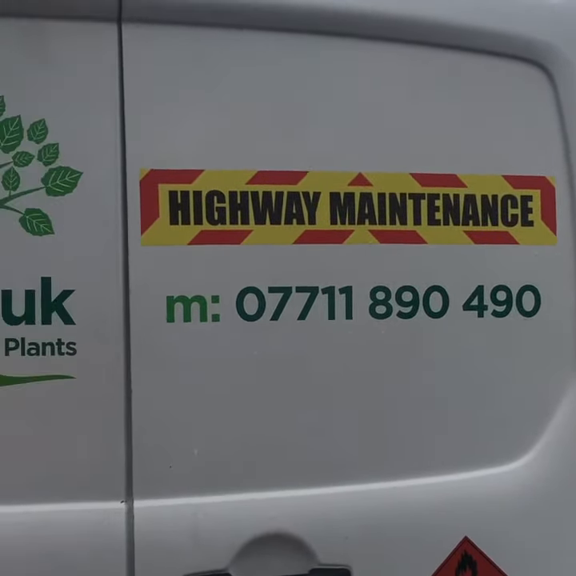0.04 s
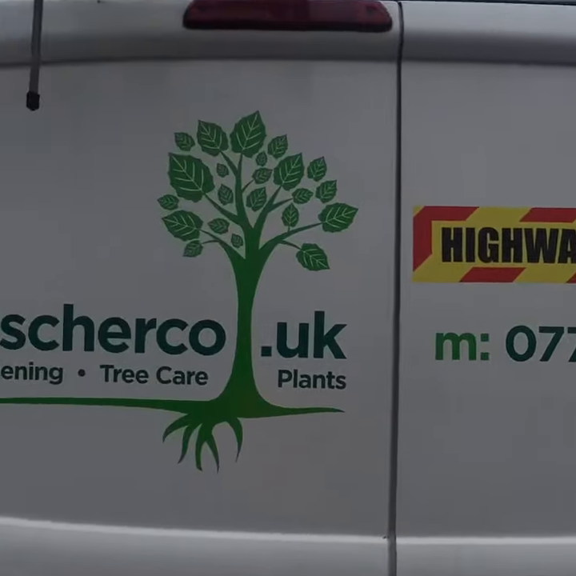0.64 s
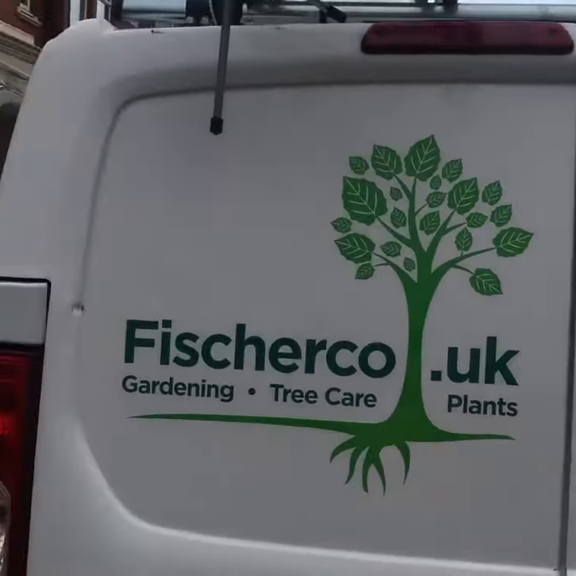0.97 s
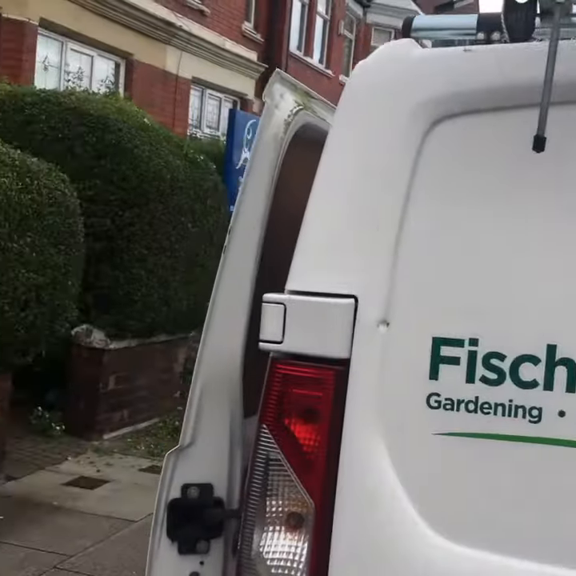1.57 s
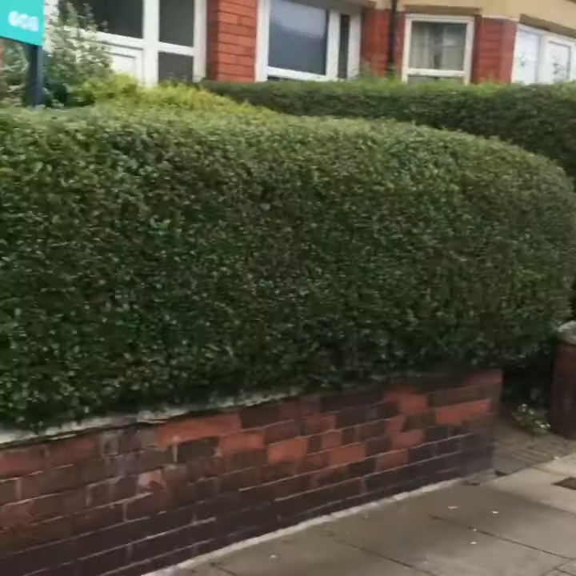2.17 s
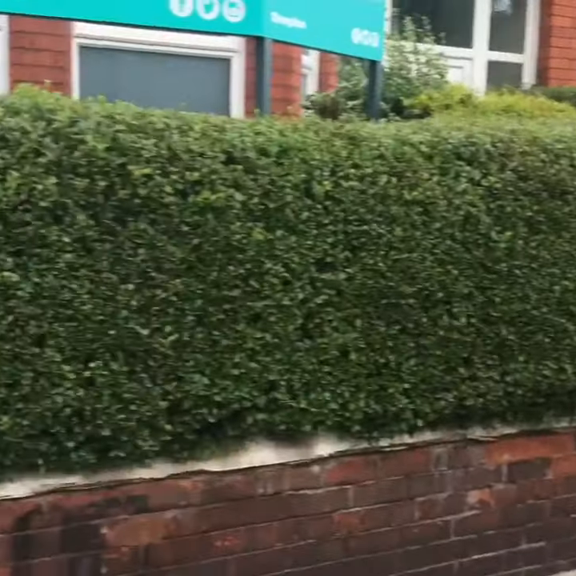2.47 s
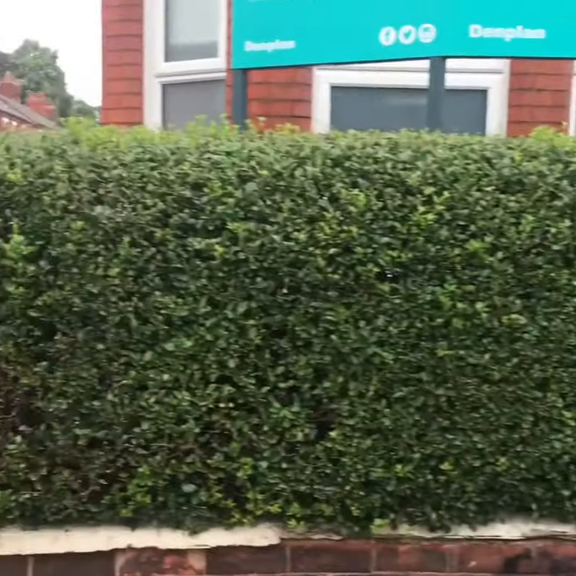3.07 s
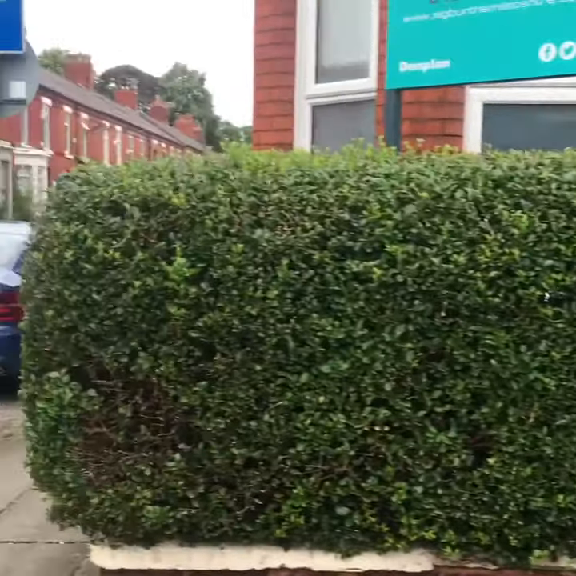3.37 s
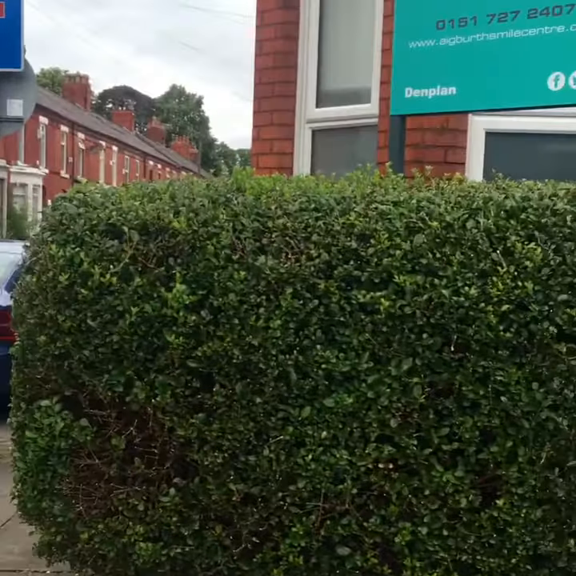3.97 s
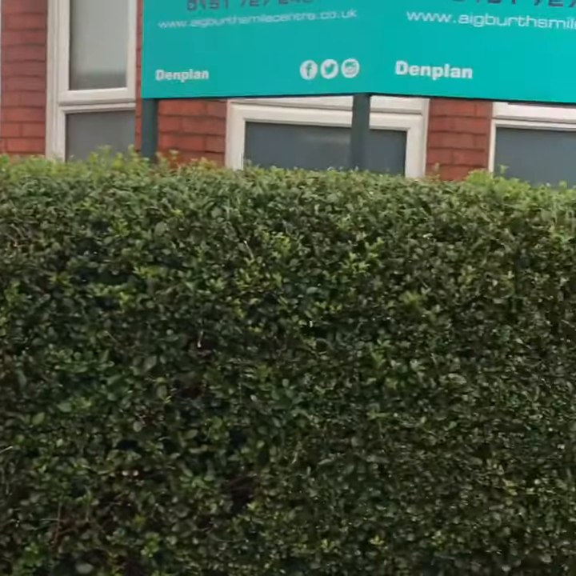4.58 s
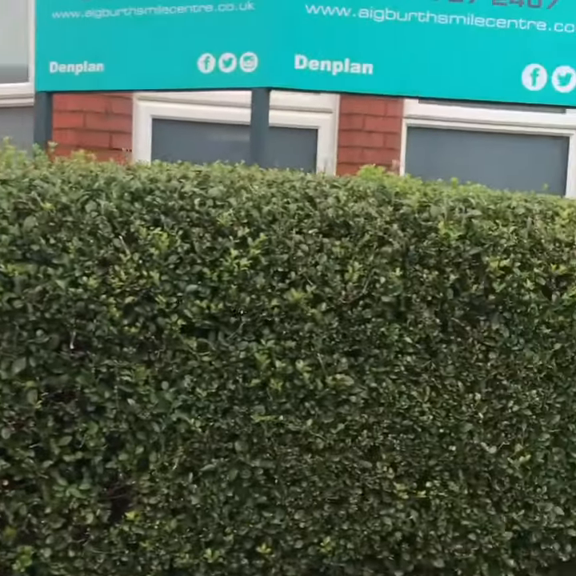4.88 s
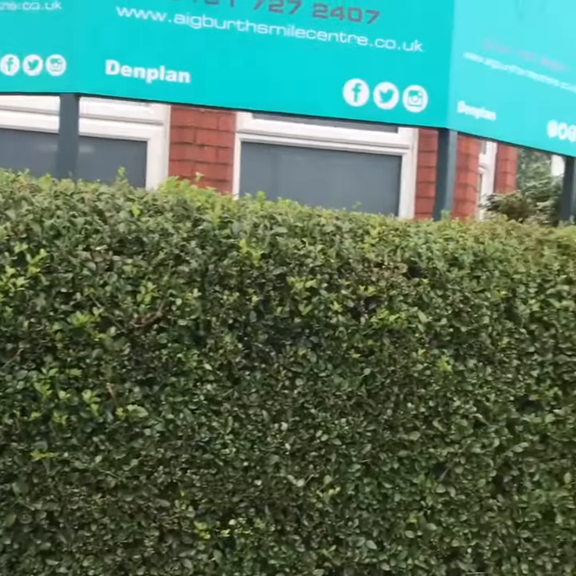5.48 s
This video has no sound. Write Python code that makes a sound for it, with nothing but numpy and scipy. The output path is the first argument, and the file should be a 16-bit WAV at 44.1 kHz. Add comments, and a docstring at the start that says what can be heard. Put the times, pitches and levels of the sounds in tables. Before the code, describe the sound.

Steady distant traffic on a street, with gusts of wind buffeting the microphone and a few faint scuffs.

```python
"""A residential street, heard on a hand-held microphone carried by a slow walker.
Distant tyres make a steady wash of noise over the rumble and hiss of the town; far engines
drone in swells, and a thin, faint whine comes and goes. Gusts break into eddies, whose pressure
swings thump on the microphone. The friction of shoes and clothing makes a few soft scuffs.
A gain control eases the level down under the loudest gusts, and a limiter holds the peaks."""
import sys
import numpy as np
from scipy import signal
from scipy.fft import rfft, irfft
from scipy.io import wavfile
from scipy.ndimage import uniform_filter1d, minimum_filter1d

SR = 44100
rng = np.random.default_rng(int(sys.argv[2]) if len(sys.argv) > 2 else 0)


def put_to_file(sound):
    """Save the sound as 16-bit audio at rate SR, in the file named by the first command-line argument."""
    columns = np.atleast_2d(sound).T  # one column per channel
    safe = np.clip(columns, -1, 1)
    whole_steps = np.round(safe * 32767)
    wavfile.write(sys.argv[1], SR, whole_steps.astype(np.int16))


N = 248283
TIME = np.arange(N) / SR
FREQS = np.fft.rfftfreq(N, 1 / SR)

# Loudness of the far tyres. Each row: time in seconds, level in dB.
TRAFFIC_LEVEL = [(0, -52), (1.2, -52.5), (1.9, -53), (3, -55.5), (3.95, -56.5), (4.42, -55), (5.2, -57),
                 (5.6, -54.8)]
# Swells of the far engines. Each row: middle in seconds, half-width in seconds, relative level in dB.
ENGINE_SWELLS = [(.45, 0.33, -51), (3.8, 0.46, -47)]
# Gusts at the microphone. Each row: start in seconds, length in seconds, wind strength in dB.
GUSTS = [(0.371, 0.22, -40), (0.818, 0.11, -39), (1.928, 0.045, -37), (2.021, 0.033, -27.5),
         (2.117, 0.067, -30.5), (2.225, 0.13, -25), (2.567, .35, -21), (2.962, .065, -39),
         (3.195, 0.032, -32.5), (4.578, 0.038, -32.5), (4.707, 0.3, -37), (5.109, .23, -36),
         (5.604, .04, -23)]
# The hardest eddies; a small, fast one sounds higher.
# Each row: time in seconds, relative peak in dB, nominal frequency in Hz.
HARD_EDDIES = [(.401, -30, 83), (.568, -24.5, 81), (.921, -27, 82), (1.527, -27, 87), (2.022, -8.5, 134),
               (2.04, -16.5, 91), (2.113, -16, 129), (2.239, -15, 131), (2.318, -15.5, 204),
               (2.578, -18.5, 247), (2.633, -12, 220), (2.661, -18.5, 267), (2.747, -17, 220),
               (2.775, -13.5, 191), (2.807, -6.5, 346), (2.819, -14, 258), (2.851, -14.5, 300),
               (2.878, -13.5, 278), (2.885, -10, 86), (2.904, -12, 276), (2.982, -24, 200),
               (3.209, -23.5, 245), (4.61, -26.5, 93), (4.735, -26, 205), (4.802, -27.5, 150),
               (4.985, -23, 108), (5.144, -21.5, 100), (5.265, -20.5, 108), (5.346, -25, 97),
               (5.612, -16.5, 198)]
# Swells of the whine. Each row: middle in seconds, half-width in seconds, level in dB.
WHINE_SWELLS = [(.45, .12, -78), (1.25, 0.2, -77), (3.1, 0.18, -78), (3.85, 0.22, -74), (4.82, 0.23, -71.5),
                (5.56, .08, -73)]
# Rubs of shoes and clothing.
# Each row: peak time in seconds, relative level in dB, rise in seconds, decay in seconds.
SCUFFS = [(.682, -72, .002, .006), (1.945, -73, .007, 0.013), (2.303, -67.5, 0.019, 0.044),
          (3.58, -75, 0.033, .04), (3.935, -69.5, 0.037, 0.028), (4.035, -72, 0.009, 0.011),
          (4.718, -66, .014, 0.035), (5.575, -66, 0.015, 0.023)]

# Spectra of the noise sources. Each row: frequency in Hz, relative spectral density in dB.
TYRE_SPECTRUM = [(300, -42), (600, -8), (800, -9), (980, 0), (1200, -.5), (1500, -7), (2000, -17),
                 (3000, -30.5), (4800, -39.5), (6200, -29), (8000, -34), (15000, -43)]
TOWN_SPECTRUM = [(25, -23.5), (60, -1.5), (180, -4.5), (300, -7), (500, -12), (800, -14), (2000, -22),
                 (4000, -31.5), (4900, -35.5), (5800, -35.5), (6800, -41), (7800, -42), (12500, -38.5),
                 (16000, -40)]
ENGINE_SPECTRUM = [(60, -17), (100, -5), (135, -1), (180, -5), (280, -9.5), (400, -26.5), (700, -58.5)]
BREEZE_SPECTRUM = [(20, -36.5), (36, -4.5), (65, 5), (110, -5.5), (180, -15.5), (300, -32.5), (500, -50),
                   (900, -60), (2000, -96)]
GUST_SPECTRUM = [(20, -36), (35, -26), (70, 2.5), (130, 10.5), (220, 1.5), (380, -20), (600, -27.5),
                 (1000, -27.5), (2000, -100)]
SCUFF_SPECTRUM = [(600, -23), (1800, 4), (2600, 15), (3100, 10), (3600, 10), (4800, 6), (6200, 6.5),
                  (7800, -1), (9000, 4), (11500, 1.5), (13500, 3), (16000, -4)]

# A narrow dip in the microphone's response. One row: centre in Hz, half-width in Hz, gain in dB.
TREBLE_DIP = (10400, 390, -4)


def amp(db):
    """Amplitude grows tenfold for every 20 dB."""
    return 10 ** (np.asarray(db) / 20)


def unit(x):
    """Normalisation to an rms of 1."""
    return x / np.sqrt(np.mean(x ** 2) + 1e-20)


def noise(spectrum):
    """Spectral shaping: white noise is filtered to the given spectrum, at an rms of 1."""
    hz, db = np.transpose(spectrum)
    response = amp(np.interp(np.log(FREQS + 1), np.log(hz), db))
    return unit(irfft(rfft(rng.standard_normal(N)) * response, N))


def drift(rate_hz):
    """Low-passed noise wanders smoothly, up to about the given rate, at an rms of 1."""
    return unit(irfft(rfft(rng.standard_normal(N)) * np.exp(-(FREQS / rate_hz) ** 2), N))


def swells(rows):
    """Gaussian envelopes sum to a gain that rises and fades."""
    return sum(amp(db) * np.exp(-((TIME - at) / half_width) ** 2) for at, half_width, db in rows)


def add(mix, start_s, sound):
    """Superposition: a sound adds to the mix from its start time on."""
    start = round(start_s * SR)
    part, sound = mix[max(start, 0):], sound[max(-start, 0):]
    part[:len(sound)] += sound[:len(part)]


def traffic(flutter_db=0.48, town_db=-52.5, town_swell_db=-0.47, follow=0.17):
    """Many far tyres merge into broadband noise; the town's rumble and hiss follow it a little."""
    level_db = np.interp(TIME, *np.transpose(TRAFFIC_LEVEL))
    tyres = amp(level_db + flutter_db * drift(20)) * noise(TYRE_SPECTRUM)
    town_level_db = town_db + follow * (level_db - level_db.mean()) + town_swell_db * drift(1.7)
    return tyres + amp(town_level_db) * noise(TOWN_SPECTRUM)


def engines(idle_db=-59, gain_db=-2.0, throb_db=2.5):
    """Incoherent sources add in power: far engines swell over an idle drone, throbbing unevenly."""
    envelope = np.hypot(swells(ENGINE_SWELLS), amp(idle_db))
    return envelope * amp(gain_db + throb_db * drift(13)) * noise(ENGINE_SPECTRUM)


def wind_strength(breeze_db=-51, attack_s=0.013, release_s=0.019):
    """Gusts build, hold and decay, adding in power to the breeze; the result is in dB."""
    power = amp(breeze_db) ** 2
    for start, length, db in GUSTS:
        early, late = np.maximum(start - TIME, 0), np.maximum(TIME - start - length, 0)
        power = power + (amp(db) * np.exp(-early / attack_s - late / release_s)) ** 2
    return 10 * np.log10(power)


def turbulence(wind_db, gain_db=0.5, onset_db=-25, spread_db=4.5, gust_gain_db=-5.5, lumpy_db=2.5):
    """Fine turbulence makes the pressure fluctuate: a lumpy rumble, brighter in stronger wind."""
    gust_share = 1 / (2 + np.exp((onset_db - wind_db) / spread_db))
    breeze = np.sqrt(1 - gust_share) * noise(BREEZE_SPECTRUM)
    gust = amp(gust_gain_db) * np.sqrt(gust_share) * noise(GUST_SPECTRUM)
    lumps = unit(amp(lumpy_db * drift(rate_hz=30)))
    return amp(wind_db + gain_db) * lumps * (breeze + gust)


def lesser_eddies(wind_db, per_s=36, offset_db=-0.5, scatter_db=2.5, ref_hz=200, ref_db=-27):
    """Stronger wind carries harder, smaller eddies. They arrive at random; rows as in HARD_EDDIES."""
    gap, strength, smallness = rng.uniform(-1, 1, (400, 3)).T
    at = np.cumsum(1 + gap) / per_s
    local_db = np.interp(at, TIME, wind_db)
    peak_db = local_db + offset_db + scatter_db * strength
    octaves = 0.03 * (local_db - ref_db) + 0.5 * smallness
    rows = np.transpose([at, peak_db, ref_hz * 2 ** octaves])
    return rows[at < TIME[-1]]


def eddies(rows, gain_db=0.67, breadth=1.055, low_cut_hz=66, damping=0.65, size=4096):
    """An eddy is one lopsided pressure swing; the microphone's high-pass response swings it back."""
    thumps, hz = np.zeros(N), np.fft.fftfreq(size, 1 / SR)
    s = 1j * hz / low_cut_hz
    bass_cut = s ** 2 / (s ** 2 + damping * s + 1)
    for (at, db, eddy_hz), phase_turns in zip(rows, rng.random(len(rows))):
        scaled = abs(hz) / (breadth * eddy_hz)
        spectrum = scaled ** 0.89 * np.exp(-scaled ** 1.77)  # a small eddy carries little bass
        swing = np.fft.fftshift(np.fft.ifft((hz > 0) * bass_cut * spectrum))
        swing *= np.exp(2j * np.pi * phase_turns) / abs(swing).max()  # phase sets the lopsidedness
        add(thumps, at - size / 2 / SR, amp(db + gain_db) * swing.real)
    return thumps


def whine(pitch_hz=2805, waver_hz=4.1):
    """Slight random frequency modulation makes a thin, far-off tone waver as it comes and goes."""
    turns = np.cumsum(pitch_hz + waver_hz * drift(25)) / SR
    return swells(WHINE_SWELLS) * unit(np.sin(2 * np.pi * turns))


def scuffs(gain_db=7.5, grit_db=2.0, grit_hz=450):
    """Sliding friction of shoes and clothing gives short bursts of gritty noise."""
    strokes = sum(amp(db) * np.exp(-((TIME - at) / np.where(TIME < at, rise, decay)) ** 2)
                  for at, db, rise, decay in SCUFFS)
    friction = unit(noise(SCUFF_SPECTRUM) * amp(grit_db * drift(grit_hz)))
    return amp(gain_db) * strokes * friction


def gain_control(x, threshold_db=-27, share=0.15, recovery_db_per_s=4, window_s=0.088):
    """Compression: the gain falls by a share of the level above a threshold, then slowly recovers."""
    smoothing = 1 / (window_s * SR)
    power = signal.lfilter([smoothing], [1, smoothing - 1], x ** 2)
    cut_db = share * np.maximum(10 * np.log10(power + 1e-12) - threshold_db, 0)
    recovery_db = recovery_db_per_s * TIME
    return x * amp(recovery_db - np.maximum.accumulate(cut_db + recovery_db, axis=-1))


def limiter(x, ceiling_db=-6, hold_s=0.01):
    """Peak limiting: the gain dips briefly around any thump that would pass the ceiling."""
    size = round(hold_s * SR)
    allowed = np.minimum(amp(ceiling_db) / (abs(x) + 1e-9), 1)
    return x * uniform_filter1d(minimum_filter1d(allowed, size), size)


def scene():
    """The pressures of street, walker and wind superpose at one microphone."""
    wind_db = wind_strength()
    street = traffic() + engines() + whine() + scuffs()
    buffeting = turbulence(wind_db) + eddies([*HARD_EDDIES, *lesser_eddies(wind_db)])
    return (street + buffeting)[None]


def record(dry):
    """Stages in cascade: the microphone's treble dip, gain control, limiter and a low-pass filter."""
    dip_hz, width_hz, dip_db = TREBLE_DIP
    response = amp(dip_db * np.exp(-((FREQS - dip_hz) / width_hz) ** 2))
    coloured = irfft(rfft(dry) * response, N)
    levelled = limiter(gain_control(coloured))
    low_pass = signal.firwin(1023, cutoff=15800, window=("kaiser", 9), fs=SR)
    return signal.oaconvolve(levelled, low_pass[None], "same")


dry = scene()
out = record(dry)
put_to_file(out)
```